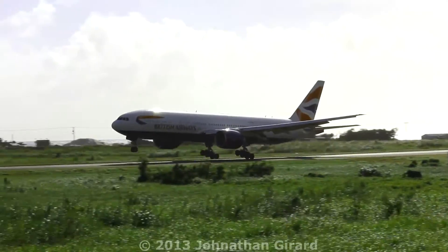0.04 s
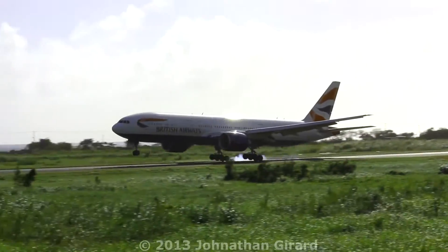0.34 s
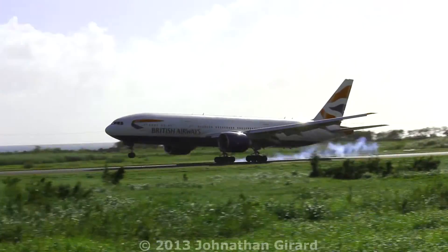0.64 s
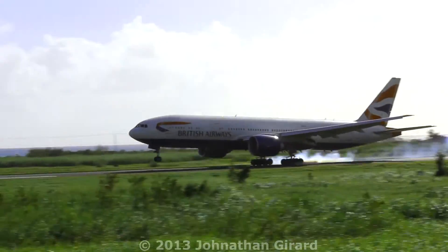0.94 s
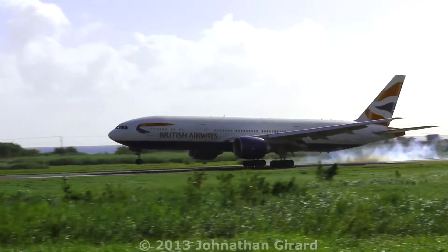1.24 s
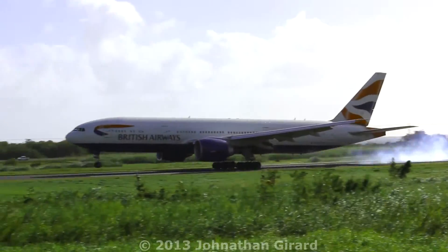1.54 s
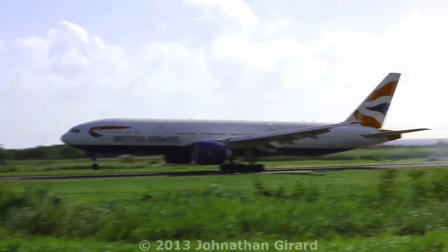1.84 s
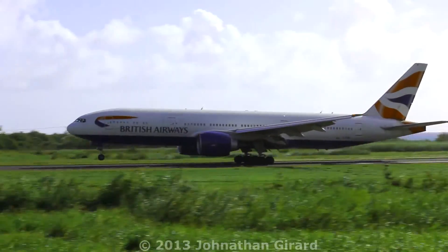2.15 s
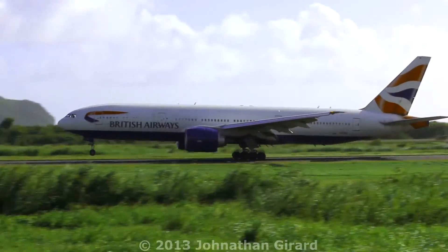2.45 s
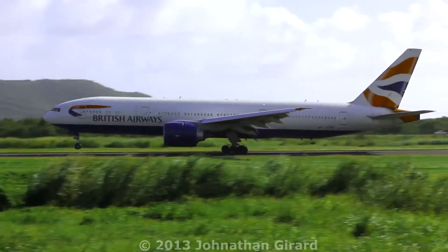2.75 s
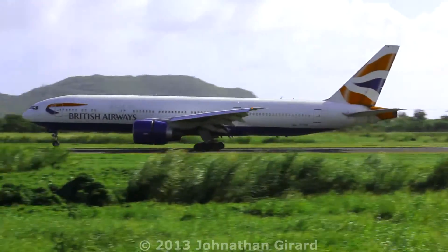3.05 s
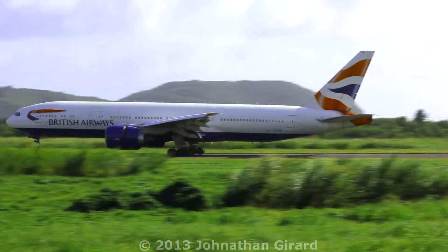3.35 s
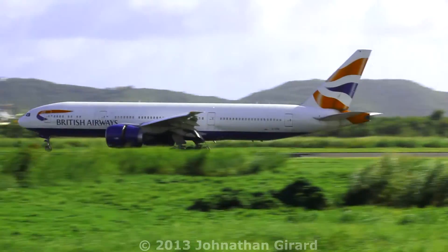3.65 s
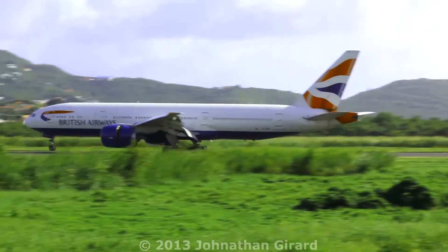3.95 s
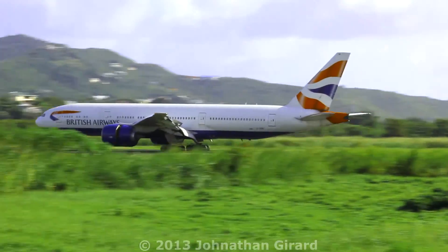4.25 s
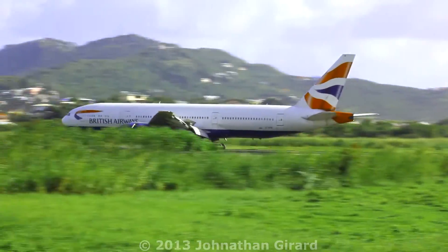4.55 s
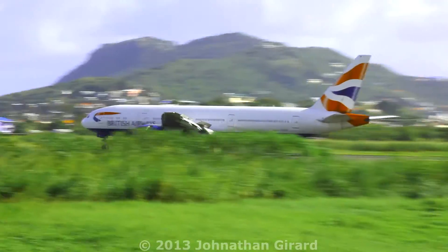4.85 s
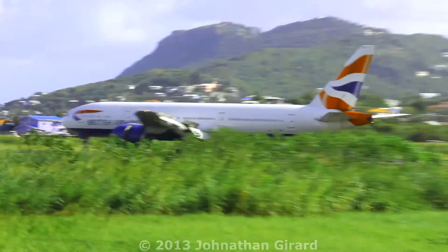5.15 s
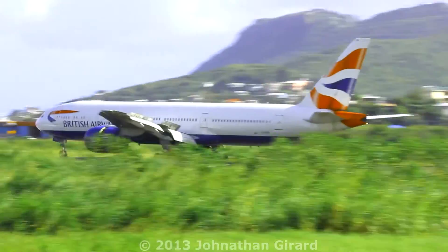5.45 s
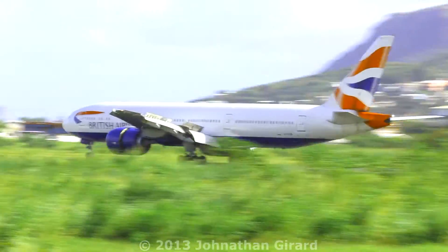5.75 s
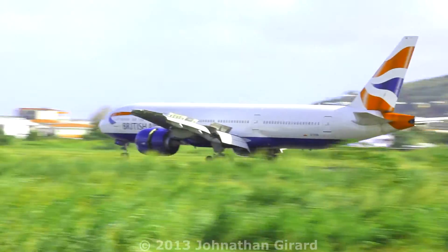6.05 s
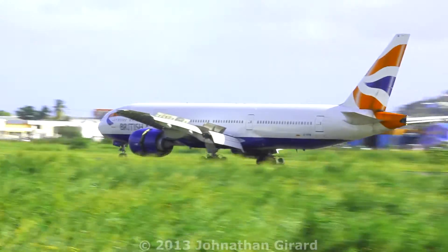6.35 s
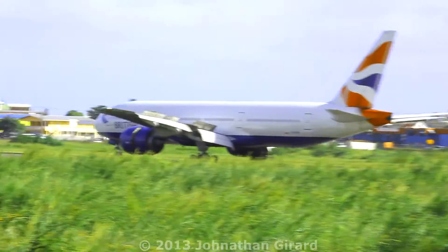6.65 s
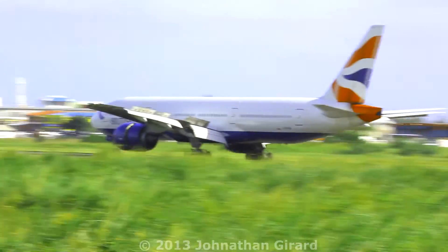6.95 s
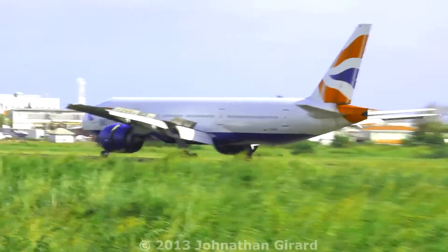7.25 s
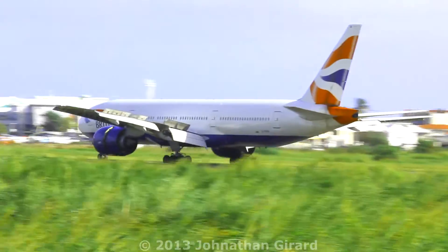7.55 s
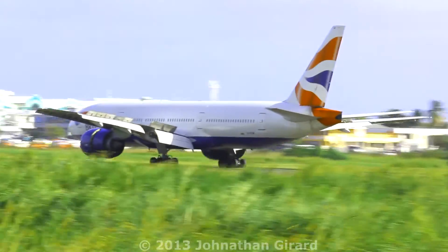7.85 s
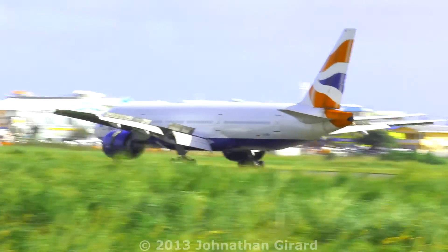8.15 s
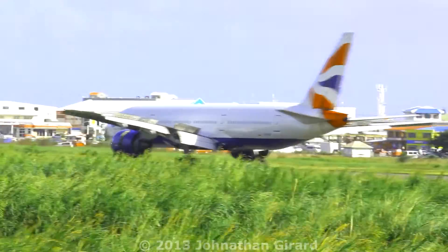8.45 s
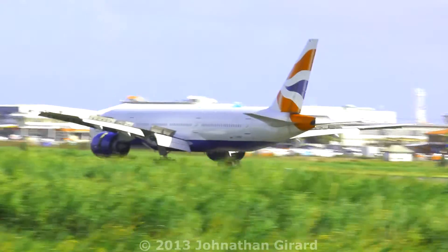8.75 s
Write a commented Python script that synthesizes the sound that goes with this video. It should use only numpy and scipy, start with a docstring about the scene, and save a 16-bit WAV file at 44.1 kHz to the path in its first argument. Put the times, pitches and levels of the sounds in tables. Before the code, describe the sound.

A large twin-engine jet lands on an open runway, heard from a distance. Its engines hiss softly, with a brief faint scrub of tyres. The noise swells as it passes, the fan whine falling in pitch and the hiss turning to a rumble. Gusts hit the microphone with low thumps and crackles, hardest just after the pass. The wind then eases while the jet rumbles away. The camera ticks a few times.

```python
"""Airliner landing in wind.

A twin-engine jet lands with a hiss of tyres, passes a camera and recedes. Its turbulent noise swells and
turns from hiss to rumble, combed by ground reflections; the fan tone falls and a turbine spools up.
Gusts on a varying breeze buffet the microphone port. The camera ticks and whines faintly."""
import sys
import numpy as np
from scipy import signal
from scipy.fft import rfft, irfft, next_fast_len
from scipy.io import wavfile
from scipy.ndimage import uniform_filter1d, map_coordinates

SR = 44100
rng = np.random.default_rng(int(sys.argv[2]) if len(sys.argv) > 2 else 0)


def store_pcm(level_fs):
    """Save levels as 16-bit WAV."""
    pcm = np.round(np.clip(level_fs, -1, 1) * 32767).astype(np.int16)
    wavfile.write(sys.argv[1], SR, np.atleast_2d(pcm).T)


N = 388793
T = np.arange(N) / SR


def jet(flutter_db=0.59, roar_trim_db=-1.37, roar_swell_share=0.92, window_s=0.4):
    """Engine noise swells and passes in three bands; gusty air on the path makes it flutter."""
    # base levels of the pass: time_s, hiss_db, roar_db, top_re_hiss_db
    pass_levels = [(0, -54.5, -56, -10), (2.3, -57.5, -54, -7), (3.05, -56.5, -52.5, -11),
                   (3.55, -48, -44.5, -15.5), (4.15, -41.5, -39, -14.5), (4.8, -50, -38.5, -9.5),
                   (6.6, -54.5, -44, -9.5), (8.05, -54.5, -46, -14), (8.82, -58.5, -42.5, -11.5)]
    # swells on top: crest_s, length_s, lift_db
    swells = [(0.88, 0.24, 2.5), (1.17, 0.38, 4.5), (1.62, 0.46, 6.5), (2.84, 0.22, 3.5), (3.4, 0.42, 3),
              (3.91, 0.11, 3), (4.55, 0.14, 5), (5.17, 0.56, 4), (6.05, 0.41, 6), (6.97, 0.35, 5),
              (8.07, 0.49, 5)]
    hiss_db, roar_db, top_re_hiss_db = curves(pass_levels)
    lift_db = sum(db * shape for shape, db in humps(swells))
    hiss_db += lift_db
    roar_db += roar_swell_share * lift_db + roar_trim_db
    x = ground_reflections(engine_turbulence())
    lows = signal.sosfiltfilt(signal.butter(3, 2300, fs=SR, output="sos"), x)
    below_top = signal.sosfiltfilt(signal.butter(3, 6000, fs=SR, output="sos"), x)
    roar = follow(lows, band(x, 900, 2000, order=4), roar_db, window_s)
    hiss = follow(below_top - lows, band(x, 2800, 5500, order=4), hiss_db, window_s)
    top = follow(x - below_top, band(x, 6000, 10000, order=4), hiss_db + top_re_hiss_db, window_s)
    shared_flutter = wander(18)
    return sum(part * undb(flutter_db * (shared_flutter + wander(22))) for part in (roar, hiss, top))


def engine_turbulence():
    """Intakes beam hiss forward, exhausts beam roar back; the aspect sets the blend."""
    # spectra by direction: freq_hz, relative_density_db
    ahead = [(60, 7), (130, 8), (300, -8.5), (450, 3), (630, 6.5), (820, -3.5), (1000, -2), (1300, -3.5),
             (1700, -1.5), (2600, -4.5), (4000, -2.5), (6300, -8), (8000, -18.5), (10500, -26.5),
             (15000, -40)]
    abeam = [(70, 4), (300, -2.5), (600, -1.5), (1000, -4.5), (1700, -5.5), (2400, -12.5), (3600, -9.5),
             (5000, -15), (6500, -23), (9000, -30.5), (15000, -60)]
    behind = [(80, -32), (150, -11), (290, 2), (500, 4.5), (720, -8), (1000, -5), (1400, -9), (1800, -12.5),
              (2400, -13.5), (3700, -15), (6000, -26.5), (9000, -45), (15000, -59)]
    # side heard: time_s, aspect (0 ahead, 1 abeam, 2 behind)
    aspect_path = [(0, 0), (2.0, 0), (3.6, 0.54), (4.8, 1.52), (6.5, 1.87), (8.8, 2.5)]
    aspect, = curves(aspect_path)
    x = 0
    for k, spectrum in enumerate([ahead, abeam, behind]):
        noise = coloured_noise(spectrum)
        weight = np.sqrt(np.maximum(1 - abs(aspect - k), 0))
        x = x + weight * noise / np.std(band(noise, 900, 5500))
    return x


def ground_reflections(x, dull_hz=6500, far_band_hz=(1500, 4800)):
    """Three short reflections comb the sound in turn; moving air shakes their lag."""
    # near engine, far engine, very short echo: time_s, comb_spacing_hz, share (before filtering)
    near = [(0, 530, 0.03), (2.5, 495, 0.18), (4.1, 640, 0.07), (4.6, 770, 0.28), (5.8, 1040, 0.22),
            (6.5, 1136, 0.55), (7.5, 1250, 0.46), (8.0, 1380, 0.45), (8.8, 1470, 0.43)]
    far = [(3.1, 427, 0.12), (4.1, 437, 0.37), (4.7, 422, 0.02)]
    close_echo = [(2.4, 2120, 0.13), (3.6, 1780, 0.047), (5.3, 1840, 0.05), (6.35, 1720, 0.2),
                  (7.0, 1800, 0.087), (7.8, 1500, 0.056)]
    dull = signal.butter(1, dull_hz, fs=SR, output="sos")
    upper_mids = signal.butter(1, far_band_hz, "band", fs=SR, output="sos")
    for table, colour in ((near, dull), (far, upper_mids), (close_echo, dull)):
        spacing_hz, share = curves(table)
        lag_samples = SR / spacing_hz * (1 + .007 * wander(7))
        reflected = signal.sosfiltfilt(colour, x)
        x = x + share * map_coordinates(reflected, [np.arange(N) - lag_samples], order=2)
    return x


def intakes():
    """The fan tone drops by Doppler shift; its overtone, an octave up, swells and falls with it."""
    # blade tones: time_s, pitch_hz, level_db
    fan = [(0, 2210, -79), (1.6, 2020, -69), (3.4, 1745, -60), (4.2, 1535, -42.5), (4.9, 1500, -55.5),
           (7.1, 1346, -48.5), (8.8, 1258, -62)]
    fan_overtone = [(3.1, 3530, -83), (3.55, 3480, -55), (4.05, 3170, -61), (4.6, 2820, -76)]
    return blade_tone(fan, width_hz=160, waver=.012) + blade_tone(fan_overtone, width_hz=180, waver=.0072)


def turbines():
    """A turbine spools up for reverse thrust; a lower stage follows."""
    # blade tones: time_s, pitch_hz, level_db
    high_stage = [(4.0, 5200, -78), (4.7, 5970, -68), (5.8, 7200, -84)]
    low_stage = [(5.2, 4800, -72), (6.25, 5200, -61), (6.8, 5400, -78)]
    high = blade_tone(high_stage, width_hz=640, waver=.02)
    return high + blade_tone(low_stage, width_hz=250, waver=.008)


def blade_tone(table, width_hz, waver):
    """Blade-passing tone, smeared into a narrow band by turbulence."""
    pitch_hz, level_db = curves(table)
    phase = 2 * np.pi * np.cumsum(pitch_hz * (1 + waver * wander(8.3))) / SR
    return undb(level_db) * (wander(width_hz) * np.cos(phase) + wander(width_hz) * np.sin(phase))


def tyres(band_hz=(4200, 7100)):
    """Tyres scrub on the runway as the wheels spin up."""
    # hiss at touchdown: crest_s, length_s, level_db
    spurts = [(1.25, 0.82, -55), (1.62, 0.089, -52)]
    envelope = sum(undb(db) * shape for shape, db in humps(spurts))
    return envelope * unit_rms(band(rng.standard_normal(N), *band_hz, order=3))


def wind(count=5000, eddy_hz=240, db_per_octave=10, spread_db=3, bunch_db=2.5, trim_db=-1):
    """Eddies of many sizes strike the port in bunches; stronger gusts drive them faster, so higher."""
    wind_db = wind_level_db()
    x = np.zeros(N)
    starts = (rng.random(count) * N).astype(int)
    eddies = zip(starts, rng.random(count), rng.exponential(size=count), rng.standard_normal(count))
    for i, skew_turns, strength, smallness in eddies:
        size_octaves = .65 * np.clip(smallness, -2, 2.5)
        speed_octaves = (np.clip(wind_db[i], -49, -30) + 30) / db_per_octave
        pitch_hz = eddy_hz * 2 ** (size_octaves + speed_octaves)
        gain = undb(spread_db * min(strength, 3) - 4 * size_octaves)  # small eddies are weaker
        add(x, i / SR, gain * eddy_swing(pitch_hz, skew_turns))
    x = band(x * undb(bunch_db * wander(70)), 59.5, 7400)
    x = x + .5 * band(x, 176, 405, order=1)  # cavity resonance behind the port
    lull_db = np.interp(wind_db, [-50, -38], [-3, 0])  # lulls sink under the engine rumble
    return follow(x, band(x, 40, 480), wind_db + lull_db + trim_db, window_s=.035)


def wind_level_db():
    """Gusts add their power to the breeze."""
    # steady wind: time_s, strength_db
    breeze = [(0, -54), (0.75, -59.5), (1.6, -46), (3.3, -46), (4.15, -40), (4.35, -33), (4.7, -39),
              (6.35, -34), (7.15, -52.5), (7.6, -48), (8.82, -51.5)]
    # short gusts: crest_s, length_s, strength_db
    gusts = [(1.616, 0.035, -41), (1.946, 0.02, -41), (2.282, 0.021, -32.0), (2.508, 0.034, -36.5),
             (2.621, 0.07, -33), (2.716, 0.055, -35.5), (2.784, 0.045, -34), (2.876, 0.027, -36),
             (3.132, 0.017, -43), (3.599, 0.017, -34), (3.884, 0.15, -28), (4.032, 0.07, -24),
             (4.263, 0.13, -27.5), (4.402, 0.042, -23.5), (4.521, 0.068, -23), (4.782, 0.047, -23.5),
             (4.864, 0.039, -21.5), (4.98, 0.18, -19.5), (5.178, 0.108, -28.5), (5.298, 0.043, -24.0),
             (5.458, 0.13, -23), (5.579, 0.064, -24.0), (5.655, 0.044, -16.5), (5.748, 0.14, -23.5),
             (5.867, 0.12, -27), (5.999, 0.062, -23), (6.087, 0.064, -19.5), (6.182, 0.034, -21),
             (6.314, 0.19, -31.0), (6.894, 0.019, -29.5), (7.445, 0.081, -33), (7.674, 0.13, -33),
             (7.817, 0.024, -32)]
    breeze_db, = curves(breeze)
    gust_power = sum((undb(db) * shape) ** 2 for shape, db in humps(gusts, attack_share=.41))
    return 10 * np.log10(undb(breeze_db) ** 2 + gust_power)


def eddy_swing(peak_hz, skew_turns):
    """One lopsided swing of pressure, 20 ms long, as an eddy crosses the port."""
    t = T[:SR // 50] - T[SR // 100]
    return np.real(np.exp(2j * np.pi * skew_turns) / (1 - 2j * np.pi * peak_hz * t) ** 2)


def buffets(thump_hz=330, db_per_octave=22, gap_s=.00388, fade_db=-4, thump_db=-1, crack_db=-7):
    """The hardest eddies: a thump, higher when harder, two weaker swings in its wake and a crack."""
    # single buffets: time_s, strength_db
    hits = [(2.641, -22.5), (2.702, -27), (2.778, -30), (2.813, -26.5), (2.879, -32), (3.134, -28.5),
            (3.888, -17), (4.037, -14), (4.058, -11.5), (4.258, -14), (4.764, -14), (4.937, -16),
            (4.981, -11), (5.042, -15), (5.438, -17), (5.579, -13), (5.638, -9.5), (5.655, -9.5),
            (5.723, -14.5), (5.75, -10.5), (5.774, -12), (5.848, -18), (6.012, -16), (6.085, -12),
            (6.191, -13), (6.307, -14), (7.686, -21)]
    out = np.zeros(N)
    for (time_s, strength_db), swings in zip(hits, rng.random((len(hits), 3, 2))):
        pitch_hz = thump_hz * 2 ** (strength_db / db_per_octave)
        for k, (skew_turns, lateness) in enumerate(swings):
            start_s = time_s - .009 + k * gap_s * (.5 + lateness)
            gain = undb(strength_db + thump_db + k * fade_db)
            add(out, start_s, gain * eddy_swing(pitch_hz, skew_turns))
        add(out, time_s, undb(strength_db + crack_db) * crack(600, 1360, order=2))
    return out


def crackle(pressure, onset_db=-29, gain_db=-11):
    """At pressure peaks the flow breaks up at the port."""
    excess = np.maximum(abs(pressure) - undb(onset_db), 0)
    return undb(gain_db) * band(excess * rng.standard_normal(N), 1640, 2500)


def spits():
    """The flow tears away from the port in short cracks."""
    # wind spits: start_s, peak_db
    tears = [(4.336, -19), (5.043, -18.5), (5.451, -17), (5.494, -20), (5.667, -17), (5.751, -35)]
    out = np.zeros(N)
    for start_s, peak_db in tears:
        add(out, start_s, undb(peak_db) * crack(500, 2500, order=3))
    return out


def crack(lo_hz, hi_hz, order, decay_s=.001):
    """Decaying noise burst, peak 1."""
    t = T[:SR // 50]
    burst = band(rng.standard_normal(len(t)) * np.exp(-t / decay_s), lo_hz, hi_hz, order)
    return burst / abs(burst).max()


def camera_ticks(bounce_s=.00197, bounce_db=-7, snap_db=-26):
    """A sharp knock and its bounce ring the plastic body."""
    # knocks: start_s, first_5ms_rms_db, snap_lift_db
    ticks = [(0.253, -32, 1), (0.867, -32.5, 3), (6.897, -51, 31), (8.247, -28, 16)]
    # body resonances: centre_hz, width_hz, gain_db
    modes = [(425, 640, 4.5), (980, 240, 10), (1550, 830, 2), (2640, 220, 8.5), (3740, 1060, -0.5)]
    push = np.zeros(SR // 20)
    push[0] = 1
    push[int(bounce_s * SR)] = undb(bounce_db)
    ring = 0
    for k, (centre_hz, width_hz, gain_db) in enumerate(modes):
        mode = band(push, centre_hz - width_hz / 2, centre_hz + width_hz / 2, order=1)
        ring = ring + (-1) ** k * undb(gain_db) * mode
    ring = band(ring, 150, 7700)
    snap = band(push, 10500, 18000, order=1)
    out = np.zeros(N)
    for start_s, rms_db, snap_lift_db in ticks:
        tick = ring - undb(snap_db + snap_lift_db) * snap
        add(out, start_s, undb(rms_db) * tick / np.std(tick[:SR // 200]))
    return out


def camera_electronics(whine_hz=15705, whine_trim_db=-2, hiss_db=-75):
    """The electronics add a thin whine and hiss."""
    # whine before trim: time_s, level_db
    whine_levels = [(1.7, -95), (2.0, -65), (3.3, -92), (4.4, -69), (5.5, -78), (6.2, -69), (8.15, -77),
                    (8.3, -63)]
    level_db, = curves(whine_levels)
    whine = undb(level_db + whine_trim_db) * np.sqrt(2) * np.sin(2 * np.pi * whine_hz * T)
    return whine + undb(hiss_db) * rng.standard_normal(N)


def undb(db):
    """Decibels to gain."""
    return 10 ** (np.asarray(db) / 20)


def curves(table):
    """Table columns, linearly interpolated over time."""
    time_s, *columns = np.transpose(table)
    return [np.interp(T, time_s, column) for column in columns]


def humps(table, attack_share=.44):
    """Per row, a smooth hump of height 1 and its dB; length is at half height."""
    for crest_s, length_s, db in table:
        side_s = length_s * np.where(T < crest_s, attack_share, 1 - attack_share)
        yield .5 ** np.minimum(((T - crest_s) / side_s) ** 2, 40), db


def unit_rms(x):
    """Scale to rms 1."""
    return x / np.sqrt(np.mean(x ** 2))


def wander(rate_hz):
    """Smooth random drift, rms 1."""
    hold = int(SR / rate_hz)
    steps = np.repeat(rng.standard_normal(N // hold + 1), hold)
    return unit_rms(uniform_filter1d(steps, hold)[:N])


def band(x, lo_hz, hi_hz, order=2):
    """Causal band-pass."""
    return signal.sosfilt(signal.butter(order, [lo_hz, hi_hz], "band", fs=SR, output="sos"), x)


def coloured_noise(spectrum):
    """Noise shaped by (freq_hz, density_db) rows, rolled off below the first."""
    freq_hz, density_db = np.transpose(spectrum)
    size = next_fast_len(N)
    bin_hz = np.maximum(np.arange(size // 2 + 1) * SR / size, 1)
    gain = undb(np.interp(np.log(bin_hz), np.log(freq_hz), density_db))
    gain *= np.minimum(bin_hz / freq_hz[0], 1) ** 2
    return irfft(rfft(rng.standard_normal(size)) * gain, size)[:N]


def follow(x, probe, level_db, window_s):
    """Scale x by the gain that holds probe to level_db."""
    power = uniform_filter1d(probe ** 2, int(window_s * SR))
    return x * undb(level_db) / np.sqrt(np.maximum(power, 1e-18))


def add(out, start_s, x):
    """Mix in a short sound."""
    i = int(start_s * SR)
    out[i:i + len(x)] += x[:N - i]


def scene():
    """Aircraft far off, wind and camera close by; mono."""
    tones = intakes() + turbines()
    pressure = wind() + buffets()
    aircraft = jet() + tyres() + tones
    wind_noise = pressure + crackle(pressure) + spits()
    return (aircraft + wind_noise + camera_ticks() + camera_electronics())[None]


def record(dry, cutoff_hz=16200):
    """A steep low-pass cuts the top."""
    return signal.sosfilt(signal.ellip(10, .2, 70, cutoff_hz, fs=SR, output="sos"), dry)


dry = scene()
out = record(dry)
store_pcm(out)
```